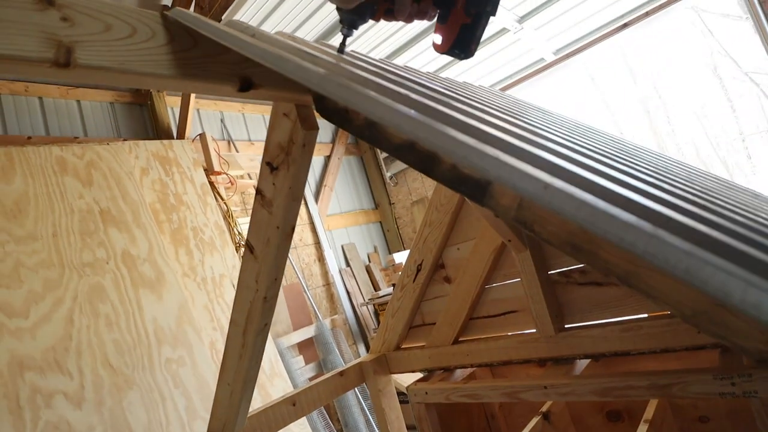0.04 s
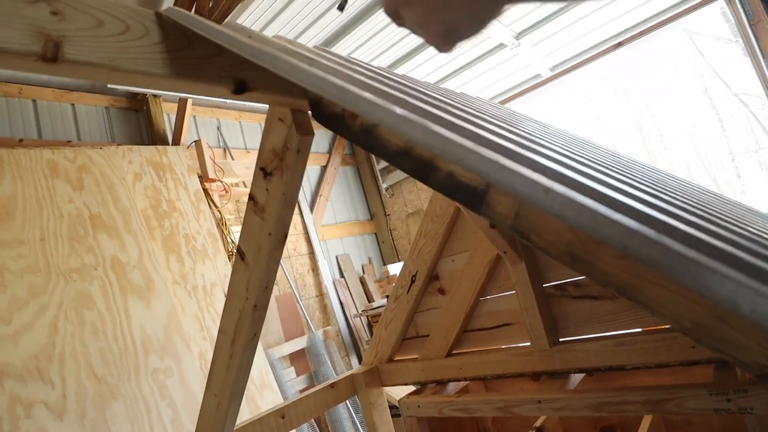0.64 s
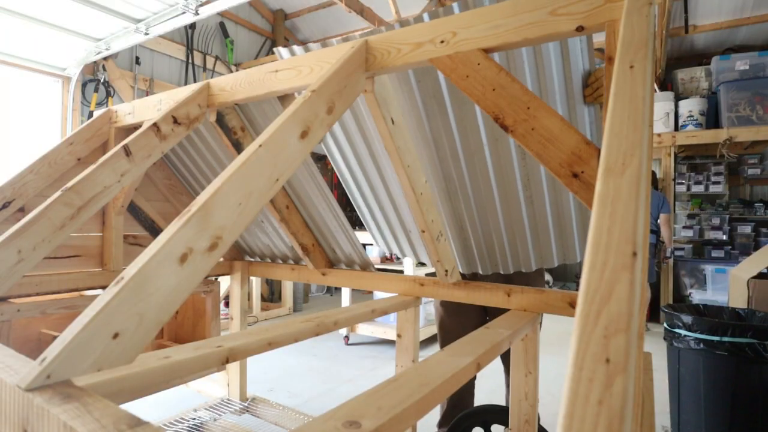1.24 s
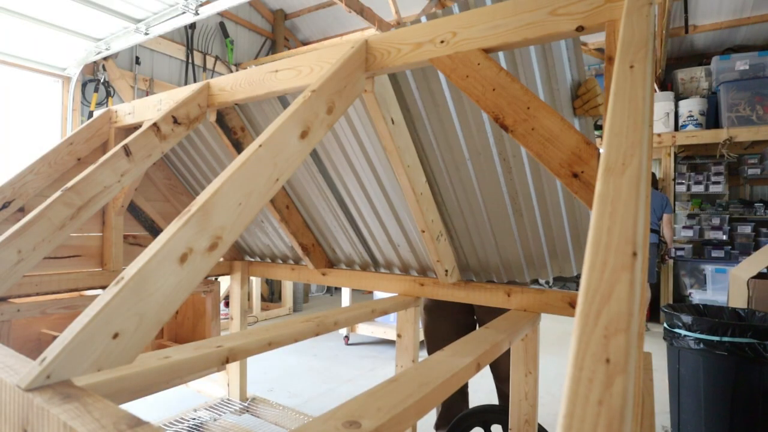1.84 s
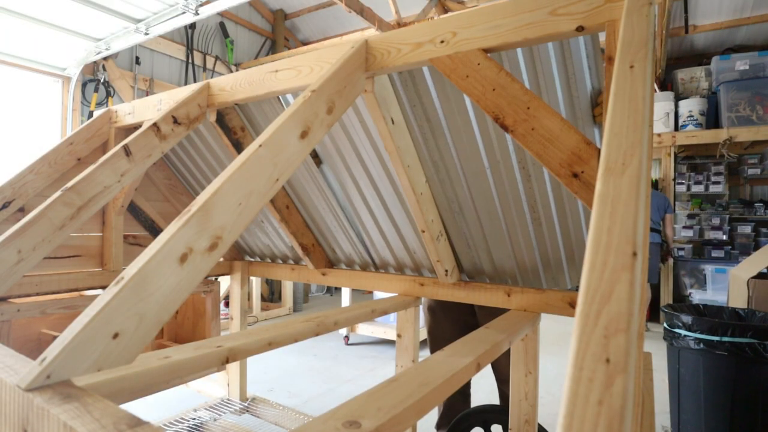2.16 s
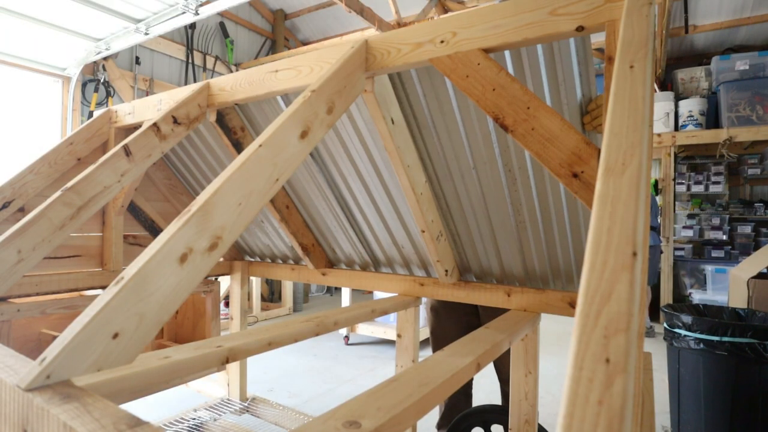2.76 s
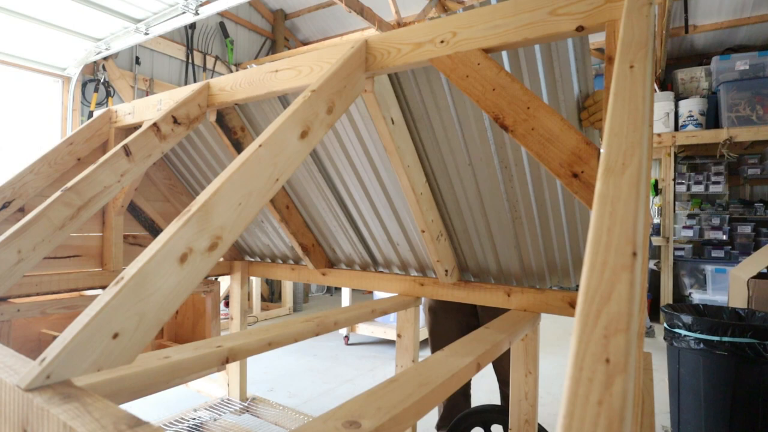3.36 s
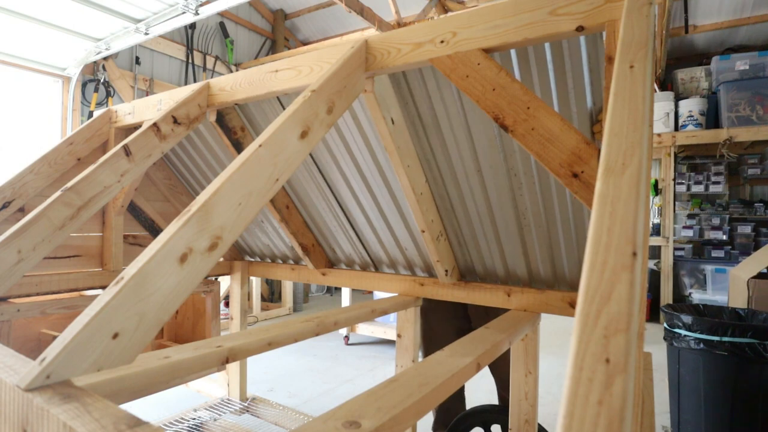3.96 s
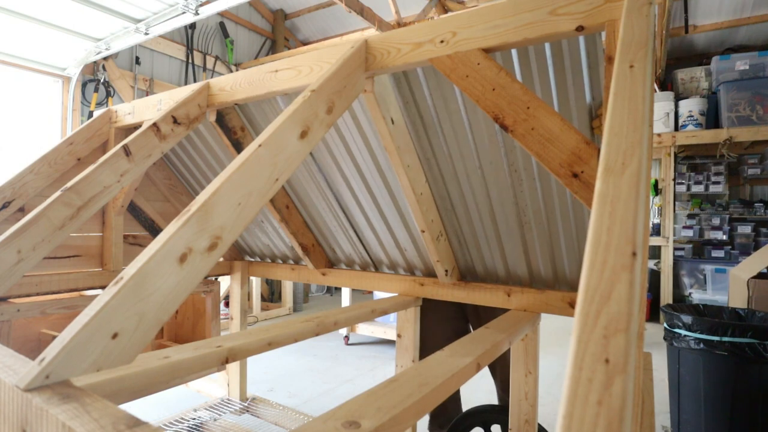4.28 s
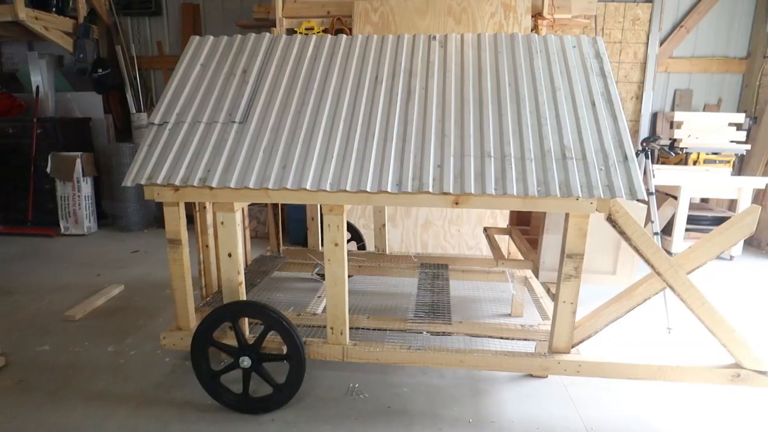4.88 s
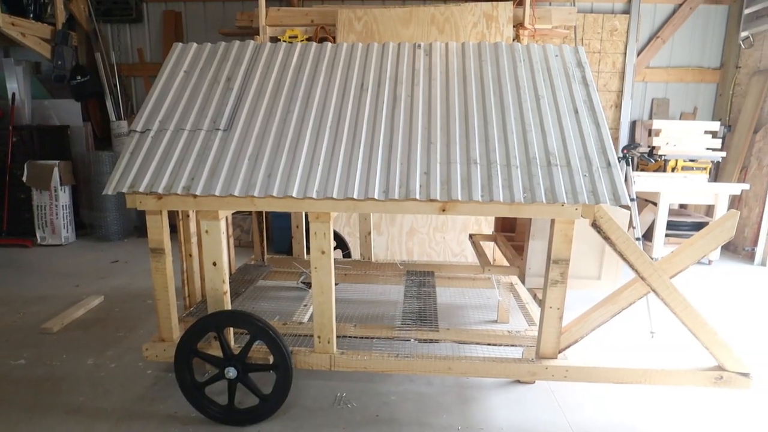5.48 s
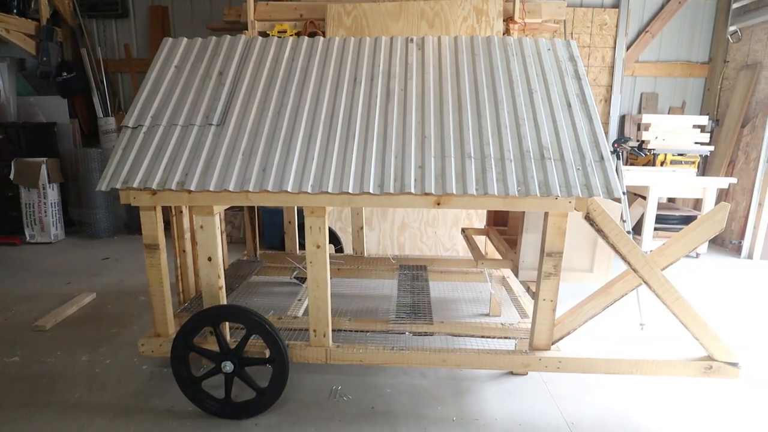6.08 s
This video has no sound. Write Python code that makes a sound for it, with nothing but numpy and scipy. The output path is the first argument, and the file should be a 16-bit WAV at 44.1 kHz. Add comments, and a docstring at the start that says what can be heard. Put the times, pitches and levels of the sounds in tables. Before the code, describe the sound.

After a quick burst of screw driving, a steel roof panel slides across timber, clanging, flexing and scraping until the workshop goes quiet.

```python
"""A corrugated steel panel is slid over the rafters of a small timber coop, close to a stereo pair. Its ribs
rub and chatter, its cut edge scrapes and squeaks, and it booms, buckles and bangs on the frame. The place is a
workshop, heard in three scenes joined by hard cuts: first an impact driver hammers a screw home, then the panel
is handled, and last the shop is quiet but for one small tick and a few low bumps on the microphone."""
import sys
import numpy as np
from scipy import signal
from scipy.fft import rfft, irfft, next_fast_len
from scipy.io import wavfile
from scipy.ndimage import map_coordinates

SR = 44100
rng = np.random.default_rng(int(sys.argv[2]) if len(sys.argv) > 2 else 0)


def transcribe(u):
    """Save the signal u as a 16-bit wav file named by the first command-line argument.

    u: samples, shape (n,) or (channels, n), limited to [-1, 1]; the rate is SR.
    q: integer samples, one column per channel.
    """
    v = np.clip(np.atleast_2d(u).T, -1, 1)
    q = np.round(v * 32767).astype(np.int16)
    wavfile.write(sys.argv[1], SR, q)


N = 274743
T = np.arange(N) / SR


def amp(db):
    """Decibels to gain."""
    return 10 ** (np.asarray(db) / 20)


def unit(x):
    """Scale to rms 1."""
    return x / np.sqrt(np.mean(x ** 2) + 1e-20)


def along(points, hz):
    """Read (frequency_hz, value) points on a log frequency axis."""
    freqs, values = np.transpose(points)
    return np.interp(np.log(hz + 1), np.log(freqs + 1), values)


def fade(t, t60):
    """Exponential decay by 60 dB in t60 seconds."""
    return np.exp(-np.log(1000) * t / t60)


def hard_hit(t, t60):
    """Envelope of a small hard hit: a spike at contact, then a short ring."""
    return amp(5) * fade(t, t60=0.009) + fade(t, t60)


def strokes(rows, rise_s, t60):
    """Envelope of (start_s, length_s, level_db) strokes: each rises, holds and dies away."""
    stroke = lambda t, length: np.clip(t / rise_s, 0, 1) * fade(np.maximum(t - length, 0), t60)
    return np.sqrt(sum((amp(db) * stroke(T - s, length)) ** 2 for s, length, db in rows))


def noise(size):
    """Two unrelated white noises."""
    return rng.standard_normal((2, size))


def wobble(per_s, size):
    """A smooth random curve with per_s knots a second."""
    knots = rng.standard_normal(int(size * per_s / SR) + 4)
    return map_coordinates(knots, [np.arange(size) * per_s / SR], order=2)


def ripple(hz, spacing_hz):
    """A random up and down over frequency, as from close-lying modes; it flattens in the bass."""
    return map_coordinates(rng.standard_normal(4096), [hz / spacing_hz], order=2) * hz / (hz + 400)


def peak(hz, centre_hz, width_hz):
    """Gain of one resonance."""
    return 1 / (1 + ((hz - centre_hz) / width_hz) ** 2)


def filtered(x, response):
    """Pass x through a frequency response."""
    size = x.shape[-1]
    padded = next_fast_len(size + 2048, True)
    hz = np.fft.rfftfreq(padded, 1 / SR)
    return irfft(rfft(x, padded) * response(hz), padded)[..., :size]


def coloured(x, spectrum, body=np.ones_like):
    """Give x a spectrum and a body's resonances, at rms 1."""
    return unit(filtered(x, lambda hz: amp(along(spectrum, hz)) * body(hz)))


def add(track, s, sound):
    """Mix a sound in at s seconds."""
    start = max(round(s * SR), 0)
    track[:, start:start + sound.shape[-1]] += sound[..., :N - start]


# The workshop's air, all round the microphone: frequency_hz, level_db
SHOP_SPECTRUM = [(15, -42.5), (25, -9.5), (80, -2.5), (208, -7), (382, -17), (1600, -27), (10500, -46.5),
                 (14000, -62)]
def room_tone(first_scene, level_db=-52.5, first_scene_db=-16):
    """A faint low rumble, quieter in the first scene."""
    return amp(level_db + first_scene_db * first_scene) * coloured(noise(N), SHOP_SPECTRUM)


# Soft low bumps on the microphone: centre_s, half_width_s, level_db
LOW_BUMPS = [(0.237, 0.025, -39), (4.852, 0.03, -36.5), (5.101, 0.024, -37), (5.154, 0.015, -30.5),
             (5.187, 0.013, -23.5), (5.324, .03, -37.5), (5.436, 0.027, -39.5), (6.199, 0.014, -38)]
def low_bumps(typical_edge_hz=84, db_per_octave=18):
    """Soft, low bumps reach the microphone; stronger bumps reach higher in frequency."""
    out = np.zeros((2, N))
    typical_db = np.median([db for _, _, db in LOW_BUMPS])
    for s, half_width, db in LOW_BUMPS:
        edge_hz = typical_edge_hz * 2 ** ((db - typical_db) / db_per_octave)
        band = lambda hz: hz ** 2 / (hz ** 2 + 45 ** 2) / (1 + (hz / edge_hz) ** 3.7)
        swell = np.hanning(int(4 * half_width * SR))
        air = filtered(noise(len(swell)), band)
        add(out, s - 2 * half_width, amp(db) * unit(air * swell) * np.sqrt(0.5))
    return out


# Reverberation of the workshop: frequency_hz, t60_s
SHOP_DECAY = [(100, 0.86), (500, 0.97), (1500, 0.69), (4000, 0.5), (10000, 0.3)]
def shop_reverb(x, build_s=0.029):
    """The shop's diffuse answer builds up and dies away, treble first."""
    hz, t, bands = signal.stft(noise(SR), SR, nperseg=256)
    decay = fade(t, along(SHOP_DECAY, hz)[:, None])
    tail = signal.istft(bands * decay * (1 - np.exp(-t / build_s)), SR, nperseg=256)[1]
    return signal.fftconvolve(x, tail / np.linalg.norm(tail[0]), axes=1)[:, :N]


# A small tick out in the quiet shop: start_s, level_db
SHOP_TICKS = [(5.95, -52)]
def ticks(gain_db=-5, reverb_db=-3):
    """Metal and timber click lightly, and the shop answers."""
    out, t = np.zeros((2, N)), np.arange(SR // 10) / SR
    for s, db in SHOP_TICKS:
        click = coloured(noise(len(t)), SCREW_SPECTRUM) * hard_hit(t, t60=0.076)
        add(out, s, amp(db + gain_db) * click)
    return out + amp(reverb_db) * shop_reverb(out)


# Colour of the screw going in, shared by the tick: frequency_hz, level_db
SCREW_SPECTRUM = [(30, -43), (80, -4), (200, 6.5), (850, 7.5), (1300, 4), (2750, 3.5), (6700, -3.5),
                  (11600, -2.5), (14000, -33)]
# The bit turns: start_s, length_s, level_db
BIT_TURNS = [(0, 0.042, -30.5), (0.15, 0.07, -38)]
# The driver's hammer strikes, close to the microphone: start_s, level_db
HAMMER_STRIKES = [(0.1543, -22.5), (0.1602, -21.5), (0.1966, -26), (0.219, -24.5), (0.238, -30.5),
                  (0.257, -33.5), (0.279, -35)]
def impact_driver(drone_edge_hz=2500):
    """The hammer strikes as the screw seats and the shop rings; the sheet drones under the bit."""
    hammer, t = np.zeros((2, N)), np.arange(SR // 8) / SR
    for s, db in HAMMER_STRIKES:
        add(hammer, s, amp(db) * coloured(noise(len(t)), SCREW_SPECTRUM) * hard_hit(t, t60=0.042))
    sheet = sheet_response()
    drone = coloured(noise(N), SCREW_SPECTRUM, lambda hz: sheet(hz) / np.hypot(1, hz / drone_edge_hz))
    turning = strokes(BIT_TURNS, rise_s=0.0011, t60=0.85)
    return hammer + shop_reverb(hammer) + turning * drone


# The steel panel's strongest modes: pitch_hz
PANEL_MODES = [501, 738, 1380, 1591, 1895, 2299, 2358, 2674, 3123, 3213, 3556, 3662]
def sheet_response(ripple_db=3.5, mode_db=6):
    """The sheet resonates in a thicket of close modes, with a few strong ones standing out."""
    grid_hz = np.arange(0, SR / 2, 2)
    strong = np.max([peak(grid_hz, hz, width_hz=7) for hz in PANEL_MODES], axis=0)
    gain = amp(ripple_db * ripple(grid_hz, spacing_hz=14) + mode_db * strong)
    return lambda hz: np.interp(hz, grid_hz, gain)


def mode_tones(t, contact, scatter_db=3, rise_s=0.002):
    """The strongest modes ring on as metallic tones, at new strengths for every blow."""
    tones = np.zeros((2, len(t)))
    for hz in PANEL_MODES:
        db = along(CLANG_SPECTRUM, hz) / 2 + scatter_db * rng.standard_normal((2, 1))
        tones += contact(hz) * amp(db) * np.sin(2 * np.pi * (hz * t + rng.random((2, 1))))
    return tones * fade(t, t60=0.75) * (1 - np.exp(-t / rise_s))


# Squeaks late in the slide: start_s, length_s, pitch_hz, level_db
STEEL_SQUEAKS = [(4.11, 0.075, 7800, -55), (4.252, 0.079, 7540, -53), (4.42, 0.042, 7650, -67)]
def squeaks(bend=0.024, waver=0.014):
    """Steel on steel sings faintly in thin, arching glides."""
    out = np.zeros((2, N))
    for s, length, hz, db in STEEL_SQUEAKS:
        arch = np.sin(np.linspace(0, np.pi, int(length * SR)))
        pitch_hz = hz * (1 + bend * (arch - 1) + waver * wobble(400, len(arch)))
        add(out, s, amp(db) * arch * np.sin(2 * np.pi * np.cumsum(pitch_hz) / SR))
    return out


# The whole sheet heaves on the rafters: start_s, length_s, level_db
SHEET_HEAVES = [(1.5, 0.18, -38.5), (2.54, 0.12, -32)]
def swaying(gain_db=-1):
    """The sheet's lowest mode swells and outlasts the push."""
    lowest_mode = unit(filtered(noise(N), lambda hz: peak(hz, centre_hz=83, width_hz=12)))
    return amp(gain_db) * strokes(SHEET_HEAVES, rise_s=0.05, t60=2.7) * lowest_mode


# The bent sheet pops through a bending mode: start_s, pitch_hz, level_db
SHEET_BUCKLES = [(1.497, 373, -21), (1.57, 492, -20.5), (1.673, 218, -30), (2.015, 496, -22),
                 (2.055, 367.6, -23), (2.1, 250.3, -20.5), (2.181, 224, -21.5), (2.404, 232.4, -25),
                 (2.529, 308, -27.5), (2.599, 221, -25), (2.902, 271, -26), (3.389, 202, -25),
                 (3.485, 499.4, -24.5), (3.405, 741, -21.5), (1.71, 752, -20.5), (4.138, 267, -28.5)]
def buckles(rise_s=0.016, max_octaves_per_s=1.9, waver=0.045):
    """Bending steel gives short low whoops; each swells and glides up or down with the tension."""
    out, t = np.zeros((2, N)), np.arange(SR // 4) / SR
    swell = t / rise_s * np.exp(1 - t / rise_s)
    for s, hz, db in SHEET_BUCKLES:
        glide = 2 ** (max_octaves_per_s * rng.uniform(-1, 1) * t)
        pitch_hz = hz * glide * (1 + waver * wobble(122, len(t)))
        cycles = np.cumsum(pitch_hz) / SR + rng.random((2, 1))
        add(out, s, amp(db) * swell * np.sin(2 * np.pi * cycles))
    return out


# Colour of the panel's cut edge, heard close: frequency_hz, level_db
EDGE_SPECTRUM = [(1500, 22), (3500, 22.5), (8000, 13.5), (11500, 7.5), (12800, -12), (15000, -21)]
# The edge flicks over a rib: start_s, level_db
EDGE_SNAPS = [(1.783, -25.5), (2.226, -31), (2.25, -26.5), (2.841, -39.5)]
def snaps():
    """The cut edge gives bright, dry snaps, too light to move the whole sheet."""
    out, t = np.zeros((2, N)), np.arange(SR // 8) / SR
    for s, db in EDGE_SNAPS:
        add(out, s, amp(db) * coloured(noise(len(t)), EDGE_SPECTRUM, np.sqrt) * hard_hit(t, t60=0.13))
    return out


def chatter(taps_per_s=60, spread_db=4):
    """Loose ribs tap the rafters at random moments and strengths."""
    taps = (rng.random(N) < taps_per_s / SR) * amp(spread_db * rng.standard_normal(N))
    tap_shape = hard_hit(np.arange(SR // 10) / SR, t60=0.17)
    power = np.abs(signal.fftconvolve(taps ** 2, tap_shape ** 2)[:N])
    return coloured(np.sqrt(power) * noise(N), CLANG_SPECTRUM)


def slips(spread_db):
    """Friction: countless tiny slips, coming in clumps."""
    return noise(N) * amp(spread_db * wobble(500, N))


# Colour of the steel face rubbing on timber: frequency_hz, level_db
RUB_SPECTRUM = [(200, -48.5), (500, -4.5), (880, 5), (1300, 2.5), (1900, 1), (4500, -14.5), (14000, -51.5)]
# Shoves over the rafters, close to the microphone: start_s, length_s, rub_db, flex_db
PANEL_SHOVES = [(0.773, 0.12, -43.5, -52), (1.051, 0.074, -32, -49.5), (1.203, 0.085, -34.5, -42),
                (1.467, 0.2, -31.5, -26.5), (1.733, 0.38, -26, -28), (2.023, 0.24, -32, -25),
                (2.394, 0.29, -39.5, -29), (2.772, 0.21, -31.5, -26), (3.24, 0.13, -42.5, -37),
                (3.428, 0.19, -31.5, -25.5), (3.683, 0.19, -29.5, -24), (4.25, 0.42, -59, -50),
                (4.65, 0.18, -39.5, -41)]
# The cut edge catches and scrapes, and the face hisses faintly as it slides: start_s, length_s, level_db
EDGE_SCRAPES = [(0.98, 0.091, -38.5), (1.1, 0.56, -57), (1.97, 0.16, -37.5), (2.42, 0.18, -51),
                (3.78, 0.11, -37), (4.1, 0.75, -59.5), (4.66, 0.21, -43.5)]
def sliding(sheet, flex_db=-1.5, rub_db=-2, hiss_db=-1, face_hiss_db=-22, sing_db=-2, chatter_db=-5):
    """The dragged sheet flexes, rubs and hisses; held lightly it sings, bent it chatters."""
    rub = strokes([(s, length, db) for s, length, db, _ in PANEL_SHOVES], rise_s=0.05, t60=1)
    flex = strokes([(s, length, db) for s, length, _, db in PANEL_SHOVES], rise_s=0.05, t60=1)
    scrape = np.hypot(strokes(EDGE_SCRAPES, rise_s=0.06, t60=0.34), amp(face_hiss_db) * rub)
    judder_db = 1.2 * wobble(45, N)
    heave_db = 1.5 * wobble(18, N)
    lightness = rub ** 2 / (rub ** 2 + flex ** 2 + 1e-20)  # 1 held lightly, 0 bent hard
    resonance = lambda hz: sheet(hz) * peak(hz, centre_hz=865, width_hz=190)
    high_pass = lambda hz: hz / (hz + 5000)
    flexing = flex * amp(flex_db + heave_db) * coloured(noise(N), BOOM_SPECTRUM, sheet)
    rubbing = rub * amp(rub_db + judder_db) * coloured(slips(-0.5), RUB_SPECTRUM, sheet)
    singing = rub * lightness * amp(sing_db + judder_db) * coloured(noise(N), RUB_SPECTRUM, resonance)
    hissing = scrape * amp(hiss_db + judder_db) * coloured(slips(0.5), EDGE_SPECTRUM, high_pass)
    chattering = rub * (1 - lightness) * amp(chatter_db) * chatter()
    return flexing + rubbing + singing + hissing + chattering


def ring(t, rise_s, crack_db, t60, tail_db, tail_t60):
    """Envelope of a blow: it cracks, spreads over the sheet and settles into a longer ring."""
    stages = amp(crack_db) * fade(t, t60=0.028) + fade(t, t60) + amp(tail_db) * fade(t, tail_t60)
    return (1 - np.exp(-t / rise_s)) * stages


# The panel's low boom and its metallic clang, heard close: frequency_hz, level_db
BOOM_SPECTRUM = [(25, -27.5), (55, -14), (82, -4.5), (130, -13), (240, 1), (380, -4), (550, -4.5),
                 (900, -9.5), (2500, -71.5)]
CLANG_SPECTRUM = [(200, -43), (480, -18.5), (750, 12.5), (1100, 13.5), (3400, -2), (4500, -5), (7000, -12),
                  (14000, -100)]
# The panel hits the coop's frame: start_s, level_db, hardness_db (treble lift), low_db, pitch_hz
FRAME_BLOWS = [(1.496, -26.5, 7, -13.5, 5060), (1.593, -29.5, 7, -13.5, 800),
               (1.695, -9.5, -5.5, -17.5, 1610), (1.721, -11.5, -6, -22, 1920),
               (1.735, -17.5, -9.5, -29, 1400), (1.782, -12.5, 2.5, -22.5, 2110),
               (1.885, -13, -3.5, -11.5, 760), (1.92, -19, 3.5, -30, 3360), (1.96, -12.5, -7, -23.5, 1545),
               (2.056, -12, -25, -35.5, 690), (2.11, -14.5, -2.5, -10, 1490), (2.41, -25, -25, -30, 1300),
               (2.738, -15.5, 2, -14, 2500), (2.84, -20.5, 1, -29, 800), (2.893, -16.5, -2.5, -21.5, 1040),
               (2.998, -28.5, 2, -24, 1430), (3.246, -35, 5, -44, 3150), (3.397, -7.5, -6.5, -12, 1720),
               (3.67, -29, 5.5, -18, 4540), (3.693, -14, -29, -21.5, 1000),
               (4.141, -23, -17.5, -29.5, 1440), (4.468, -44, 8.5, -21, 5600),
               (4.484, -21, -1.5, -24, 1270), (4.665, -24.5, -1.5, -43, 2100),
               (4.794, -14.5, -11.5, -14, 1340), (4.815, -18.5, 2.5, -40, 2205)]
def blows(sheet, clack_db=-18, knock_db=-11, clang_db=-14, tone_db=-23, boom_db=-15, edge_db=-20,
          shelf_hz=2600, rib_hz=3350):
    """A blow clacks the ribs, knocks at the struck spot's pitch and sets the whole sheet ringing."""
    out, t = np.zeros((2, N)), np.arange(SR * 2 // 3) / SR
    burst = lambda spectrum, body=np.ones_like: coloured(noise(len(t)), spectrum, body)
    heaviest_db = max(row[1] for row in FRAME_BLOWS)
    for s, db, hardness_db, low_db, pitch_hz in FRAME_BLOWS:
        weight_db = db - heaviest_db
        crack_db = -0.5 + 0.81 * weight_db  # light blows crack less
        damping_db = 0.17 * weight_db  # and stay drier
        contact = lambda hz: amp(hardness_db / (1 + (shelf_hz / (hz + 1)) ** 6))
        struck = lambda hz: sheet(hz) * contact(hz) * amp(4 * ripple(hz, spacing_hz=58.77))
        clack = burst(CLANG_SPECTRUM, lambda hz: struck(hz) * peak(hz, rib_hz, width_hz=520))
        clack *= ring(t, rise_s=0.0003, crack_db=11, t60=0.16, tail_db=-7, tail_t60=0.7)
        knock = burst(CLANG_SPECTRUM, lambda hz: struck(hz) * peak(hz, pitch_hz, 0.22 * pitch_hz))
        knock *= ring(t, rise_s=0.0016, crack_db=crack_db, t60=0.19, tail_db=-13, tail_t60=0.51)
        clang = burst(CLANG_SPECTRUM, struck) * (1 - np.exp(-t / 0.0027)) * fade(t, t60=0.73)
        boom = burst(BOOM_SPECTRUM, sheet)
        boom *= ring(t, rise_s=0.0012, crack_db=-5.5, t60=0.29, tail_db=3, tail_t60=0.98)
        edge = burst(EDGE_SPECTRUM) * fade(t, t60=0.39)
        rattle = amp(3 * wobble(350, len(t)))
        impact = amp(clack_db) * contact(rib_hz) * clack + amp(knock_db) * knock
        ringing = amp(clang_db) * rattle * clang + amp(tone_db + damping_db) * mode_tones(t, contact)
        sizzle = amp(edge_db + 2.7 * hardness_db) * rattle * edge
        add(out, s, amp(db) * (impact + amp(damping_db) * ringing + sizzle))
        add(out, s, amp(low_db + boom_db) * boom)
    return out


# Stereo width of the close roof and of the shop's diffuse air: frequency_hz, side_db
ROOF_WIDTH = [(70, -44), (400, -15), (1200, -4.5), (3000, 0.5), (8000, 3.5), (12000, 9)]
AIR_WIDTH = [(150, -14.5), (400, 2.5), (8000, 8)]
def stereo_pair(x, width, wider_db=0, lead=0.34):
    """Two microphones hear narrow bass and wide treble; the left one leads a little."""
    mid, unrelated = x
    spread = lambda hz: amp(along(width, hz) + wider_db)
    quarter_cycle_ahead = filtered(mid, lambda hz: 1j * spread(hz))
    side = np.sqrt(1 - lead ** 2) * filtered(unrelated, spread) + lead * quarter_cycle_ahead
    return np.array([mid + side, mid - side])


# Hard cuts to the panel and then to the quiet shop: start_s
SCENE_CUTS = [0.836, 4.837]
def scene():
    """Driving the screw, handling the panel and the quiet shop follow each other."""
    sheet = sheet_response()
    first, last = T < SCENE_CUTS[0], T >= SCENE_CUTS[1]
    middle = ~(first | last)
    driver_and_tick = stereo_pair(first * impact_driver() + ticks(), ROOF_WIDTH, wider_db=1.5)
    panel = blows(sheet) + snaps() + sliding(sheet) + buckles() + swaying() + squeaks()
    air = room_tone(first) + low_bumps()
    return stereo_pair(air, AIR_WIDTH) + driver_and_tick + stereo_pair(middle * panel, ROOF_WIDTH)


def record(dry, top_hz=14700):
    """The recorder rounds off the highest peaks and limits the band."""
    rounded = dry / (1 + dry ** 4) ** (1 / 4)
    return filtered(rounded, lambda hz: 1 / (1 + (hz / top_hz) ** 80))


dry = scene()
out = record(dry)
transcribe(out)
```